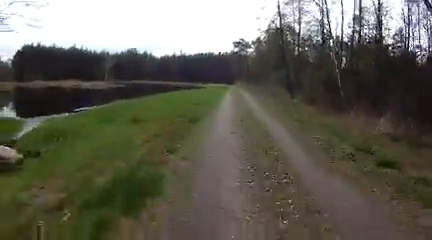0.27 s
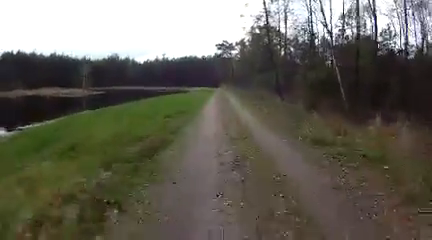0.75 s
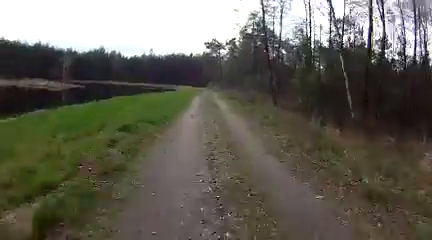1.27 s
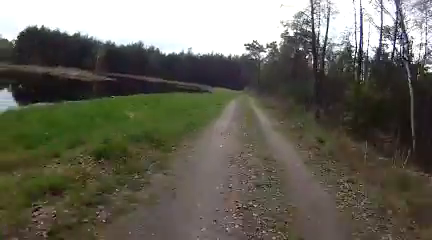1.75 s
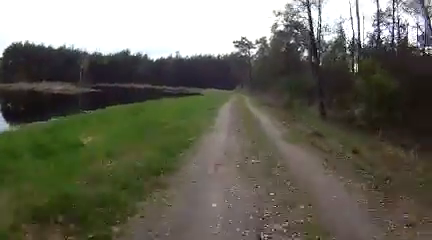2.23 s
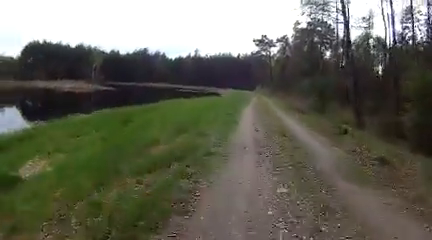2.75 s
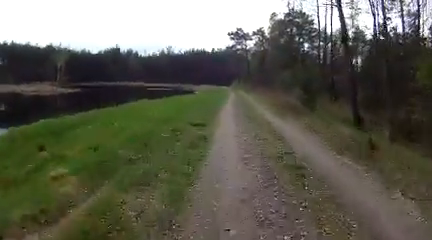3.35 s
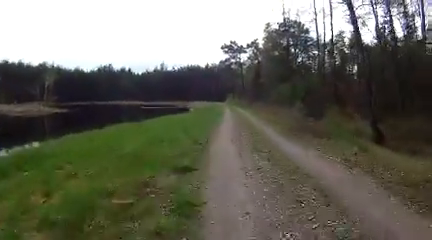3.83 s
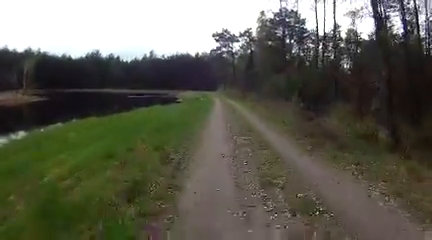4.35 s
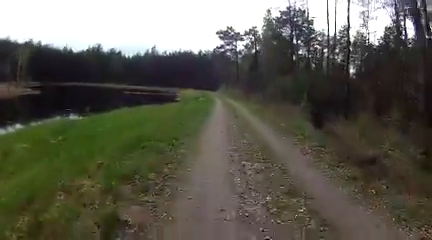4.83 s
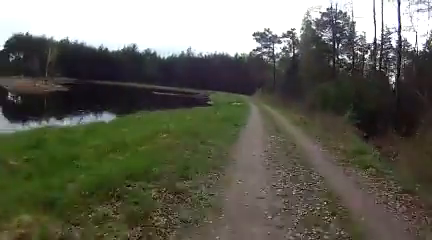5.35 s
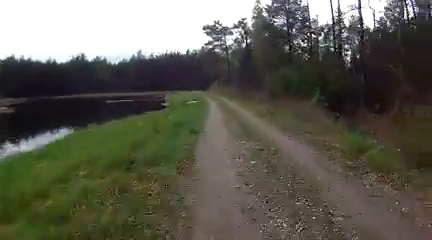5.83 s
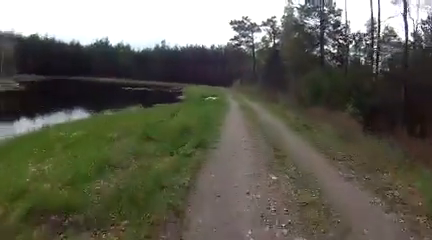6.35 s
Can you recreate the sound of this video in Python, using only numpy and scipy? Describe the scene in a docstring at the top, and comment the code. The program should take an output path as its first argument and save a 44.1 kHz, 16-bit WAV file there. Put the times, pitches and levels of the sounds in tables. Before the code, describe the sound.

Low rumble of bicycle tyres on rough gravel, with a loose part rattling in bursts that thin out as the ride calms.

```python
"""A bicycle rolls along a gravel track, heard through its frame by a small camera on the handlebar.
It opens on rough ground: the mount sways near 50 Hz, the tyres drum the frame's modes and a loose part
rattles on the downswings. From half a second in, stones clack the tubes and jolt the frame. Past 2.5 s
the ride calms and the hits thin out, until a last flurry just after 6 s. Faint hiss lies under it all,
and the camera holds every sample at 12 kHz, which mirrors the sound around 6 and 12 kHz."""
import sys
import numpy as np
from scipy import signal
from scipy.io import wavfile
from scipy.ndimage import uniform_filter1d

SR = 44100
rng = np.random.default_rng(int(sys.argv[2]) if len(sys.argv) > 2 else 0)


def store_pcm(level_fs):
    """Save levels as 16-bit WAV."""
    pcm = np.round(np.clip(level_fs, -1, 1) * 32767).astype(np.int16)
    wavfile.write(sys.argv[1], SR, np.atleast_2d(pcm).T)


N = 290619

# Blows of the loose part. Each row: time in seconds, level in dB, dull against bright part in dB,
# length of the bounces in seconds, first blow against the bounces in dB.
BLOWS = [(0.0074, -25, -3, 0.039, 1), (0.0278, -25, -5.5, 0.032, -4), (0.048, -24, -9, 0.022, -5),
         (0.0674, -34, -9, 0.053, -3), (0.0894, -42, -6, 0.052, -2), (0.1114, -44, -5, 0.04, -1),
         (0.1314, -37, -3, 0.041, -4), (0.1565, -28.5, -4, 0.02, 1), (0.169, -28.5, -4, 0.04, 8),
         (0.1943, -24.5, -19, 0.01, 11.5), (0.2133, -34, -7, 0.018, 13.5), (0.25, -32.5, -7, 0.022, 5),
         (0.2736, -26.5, -3, 0.028, 1.5), (0.2941, -29, -7.5, 0.052, 8), (0.3137, -26.5, -6.5, 0.026, 1.5),
         (0.3588, -30, -7.5, 0.04, 3), (0.4295, -33, -6, 0.015, 1), (0.4505, -36.5, -3.5, 0.036, 1.5),
         (0.5134, -38, -5.5, 0.028, -4), (0.5654, -37.5, -12, 0.05, 3), (0.607, -32, -3.5, 0.035, 1.5),
         (0.63, -24.5, -10.5, 0.055, 4), (0.6692, -30, -1.5, 0.03, 4), (0.7872, -37, -5, 0.041, 4),
         (0.8086, -33, -6.5, 0.046, -2), (0.854, -31.5, -10, 0.032, 1.5), (0.8725, -31, -6, 0.035, -1),
         (0.9154, -24, -11, 0.047, 5), (0.9358, -28, -5.5, 0.036, -5), (0.9812, -26.5, -14, 0.044, 4),
         (1.0721, -47, -13, 0.021, 1.5), (1.1228, -34.5, -18, 0.065, 7.5), (1.1436, -28, -2.5, 0.036, 1.5),
         (1.1943, -29.5, -15, 0.032, 1), (1.2183, -26.5, -5.5, 0.032, 1.5), (1.2421, -28, -1.5, 0.032, 10),
         (1.27, -23.5, -15, 0.035, 1.5), (1.301, -26.5, -5, 0.027, -7), (1.321, -25, -7, 0.019, 5),
         (1.36, -40, -25, 0.023, 6), (1.376, -21.5, -21, 0.01, 5), (1.3982, -27.5, -2.5, 0.062, 6),
         (1.4243, -29.5, -16, 0.058, 8), (1.4437, -29.5, -8, 0.045, -5), (1.4692, -27, -6, 0.036, 6),
         (1.4915, -25.5, -5, 0.018, 8), (1.5135, -33, -9, 0.01, 7), (1.551, -30.5, -10, 0.055, 3),
         (1.5913, -24.5, -8, 0.055, -4), (1.6277, -26.5, -4.5, 0.09, 0), (1.6581, -34.5, -8, 0.052, 1.5),
         (1.6872, -31.5, -4.5, 0.06, -1), (1.728, -30.5, -7, 0.016, 10), (1.7444, -28, -7.5, 0.047, 8),
         (1.7672, -24.5, -7, 0.024, -2), (1.792, -26.5, -17, 0.037, 3), (1.8178, -32, -5.5, 0.055, 9),
         (1.851, -40, -3, 0.037, 0), (1.8832, -30, -6.5, 0.032, 5), (1.9329, -32.5, -0.5, 0.03, -1),
         (1.953, -21, -9, 0.021, -17), (2.0258, -27.5, -8, 0.041, 7), (2.0494, -27, -3, 0.017, 1.5),
         (2.0674, -25, -4, 0.06, 7), (2.0918, -28, -3, 0.022, 9), (2.1061, -26, -5, 0.037, 8),
         (2.1283, -24, -9.5, 0.033, 6), (2.1505, -22, -9, 0.018, 3), (2.1694, -30.5, -6, 0.025, 9),
         (2.1918, -27, -6, 0.027, 5), (2.2092, -27.5, -5, 0.033, 3), (2.232, -27.5, -14, 0.032, 4),
         (2.2532, -31.5, -5.5, 0.042, 6), (2.2875, -30.5, -4.5, 0.037, 5), (2.3077, -27.5, -8, 0.072, -2),
         (2.3325, -31.5, -1.5, 0.081, 1.5), (2.366, -27, -4, 0.022, 5), (2.3853, -28, -4.5, 0.047, 7.5),
         (2.4086, -30, -22, 0.03, 4), (2.4272, -28, -6.5, 0.071, 3), (2.4683, -31.5, -4.5, 0.014, 8),
         (2.4902, -25.5, -4.5, 0.033, -1), (2.5097, -29.5, -13, 0.048, 7), (2.529, -30.5, -0.5, 0.016, 1.5),
         (2.574, -46, 0, 0.03, -3), (2.6329, -52, 1, 0.024, -1), (2.6698, -39, -13, 0.017, 7),
         (2.7167, -29, -4, 0.016, -1), (2.7374, -27.5, -9, 0.051, 7), (2.7806, -40, -15, 0.046, 1.5),
         (2.799, -37.5, -2, 0.06, 1.5), (2.8883, -42, 0.5, 0.044, 1.5), (2.9088, -27, -13, 0.02, -13),
         (2.9916, -34, -9, 0.041, 5), (3.0345, -34.5, -20, 0.044, 9), (3.047, -38, -0.5, 0.048, 3),
         (3.1303, -41, -0.5, 0.017, 1), (3.1587, -32, -6.5, 0.018, 6), (3.312, -34, -17, 0.04, 1.5),
         (3.3324, -37.5, -3.5, 0.02, 1.5), (3.3813, -38.5, -7, 0.021, -3), (3.764, -45, -2, 0.026, -1),
         (3.7798, -36.5, -4, 0.034, 0), (3.9163, -34, -8, 0.041, 3), (3.9454, -46.5, 0, 0.03, 1.5),
         (4.0225, -35, -13, 0.034, 7), (4.0432, -33, -6, 0.024, 9), (4.0632, -31.5, -6.5, 0.046, 7),
         (4.1032, -43, -5, 0.011, 5), (4.2544, -41.5, -10, 0.019, 6), (4.4025, -40, -5, 0.05, 3),
         (4.4162, -34, -5, 0.027, 1.5), (4.4762, -53, -3, 0.028, 1.5), (4.4878, -38.5, -2, 0.045, 0),
         (5.1244, -45.5, -1, 0.026, 3), (5.1348, -44.5, -7, 0.025, -24), (5.4246, -57.5, 8.5, 0.027, -1),
         (5.497, -55, 4, 0.026, 5), (5.532, -37.5, -7.5, 0.025, 1.5), (5.5406, -45, -1, 0.017, 1.5),
         (5.765, -42, -7, 0.01, -8), (5.9281, -43, -16, 0.012, 12.5), (6.1159, -44.5, 2, 0.028, 8.5),
         (6.129, -38, -16, 0.028, 4), (6.1384, -41.5, 2, 0.016, 1.5), (6.1704, -59, 4, 0.02, 3),
         (6.2442, -42, -10, 0.01, 8), (6.2685, -31, -5.5, 0.036, 4), (6.2877, -31.5, -5, 0.017, 1.5),
         (6.3068, -30, -10, 0.024, 9), (6.328, -32, -2, 0.021, 7), (6.34, -26.5, -7, 0.013, 1.5),
         (6.3651, -33, -15, 0.045, 10.5), (6.3844, -40.5, -0.5, 0.032, 1.5), (6.4265, -43, -1.5, 0.043, -1),
         (6.4907, -54, -15, 0.022, 7), (6.5283, -45, -5, 0.034, -1), (6.54, -36, -9.5, 0.018, 5)]
# Stones under the wheel. Each row: time in seconds, push on the frame in dB,
# upper against middle modes in dB, clack of the tubes in dB.
STONES = [(0.449, -19, 17, -56), (0.589, -11.5, 3, -52), (0.826, -23, 5, -35.5), (.896, -13, 1, -35),
          (0.954, -10, 7, -48), (1.078, -28, 2, -39.5), (1.147, -12, -7, -38), (1.245, -5.5, -0.5, -26),
          (1.3, -15, -4, -51), (1.33, -12, -6, -40), (1.37, -13, 10, -48), (1.404, -5.5, 0, -29.5),
          (1.45, -9, 5, -34), (1.492, -11, -12.5, -29), (1.53, -30, 8, -38), (1.548, -16, 8, -38),
          (1.599, -6, 1, -27), (1.711, -12.5, 15.5, -55), (1.797, -42, -8, -38), (1.85, -31, -19, -39),
          (1.908, -27, 4, -31), (1.936, -38, 5, -36), (1.954, -9.5, -7, -56), (2.0, -10, -1, -38),
          (2.02, -11.5, 4, -38), (2.056, -11.5, 3, -32), (2.107, -22, 20, -30.5), (2.227, -15, 10, -50),
          (2.308, -14, 8, -37), (2.37, -8.5, 3, -53), (2.385, -27, -6, -30.5), (2.429, -12.5, 0, -38),
          (2.512, -22, 9, -50), (2.649, -14, -3, -41), (2.699, -14, 2, -56), (2.874, -19, -6, -46),
          (3.144, -20, 5, -45), (3.333, -26, 13, -54), (3.372, -20.5, 13, -49), (3.489, -38, 5, -57),
          (3.628, -22, 12, -46), (3.729, -10.5, -4, -43), (3.872, -13.5, 6, -47), (3.938, -9.5, 2, -42),
          (4.022, -25, 9, -45), (4.088, -18.5, 9, -52), (4.852, -27, -7, -50), (5.324, -27, -17, -56),
          (5.358, -42, -4, -42.5), (6.118, -18, 1, -42), (6.171, -28, 0, -42), (6.242, -13, 12, -50),
          (6.261, -6.5, 2.5, -40), (6.313, -11.5, 14, -46), (6.341, -9.5, -8, -29.5)]
# Low modes of the frame and mount. Each row: pitch in Hz, nominal width in Hz, gain in dB.
FRAME_MODES = [(23.6, 29.6, 3.5), (78.9, 59.3, 5.5), (116, 58.4, -1), (156.8, 64.7, -2), (228.7, 58.5, 2),
               (263, 52.5, 3), (349.8, 29, 8), (396.3, 7.6, -6.5)]
# Higher modes of the tubes. Each row: pitch in Hz, nominal width in Hz, gain in dB.
TUBE_MODES = [(459, 60, 4), (526.7, 40.5, 5), (794.6, 90, 2.5), (840.4, 37.5, -5.5), (1203, 107, -10),
              (1243, 26, -34)]
SWAY_HZ = 49.57


def undb(db):
    """Decibels to gain."""
    return 10 ** (np.asarray(db) / 20)


def unit(x):
    """Scaled to rms 1."""
    return x / np.sqrt(np.mean(x ** 2))


def band(x, hz, width):
    """One resonance, gain 1 at its centre."""
    return signal.lfilter(*signal.iirpeak(hz, hz / width, SR), x)


def ring(x, modes, widen=1):
    """Resonances side by side, each applied twice so that the valleys stay dark."""
    stretch = 1.064 * widen
    return sum(undb(db) * band(band(x, hz, stretch * width), hz, stretch * width)
               for hz, width, db in modes)


def wander(rate_hz):
    """A control that glides from one random level to the next."""
    hold = int(SR / rate_hz)
    return uniform_filter1d(np.repeat(rng.standard_normal(N // hold + 1), hold), hold)[:N]


def grit(per_s, spread_db):
    """Random clicks, a few much stronger than the rest."""
    hit = rng.random(N) < per_s / SR
    return hit * rng.standard_normal(N) * undb(spread_db * np.minimum(rng.exponential(size=N), 3))


def swells(times, levels_db, rise_s, fall_s):
    """Power envelope of events that rise on a bell curve and die away."""
    power, t = np.zeros(N), np.arange(N) / SR
    for at, db, fall in zip(times, levels_db, np.broadcast_to(fall_s, len(times))):
        i, j = np.clip([int((at - .15) * SR), int((at + .6) * SR)], 0, N)
        since = t[i:j] - at
        fade = np.where(since < 0, (since / rise_s) ** 2, np.abs(since / fall) ** 1.04)
        power[i:j] += undb(2 * db) * np.exp(-fade)
    return power


def track_roughness():
    """How hard the track drums the tyres from moment to moment, in dB."""
    # Each row: time in seconds, level in dB.
    roughness = [(0.0, -28), (0.4, -34.5), (0.97, -30.5), (1.04, -36), (1.19, -28), (1.32, -34),
                 (1.61, -27), (1.72, -28.5), (2.31, -31.5), (3.03, -35.5), (4.26, -36.5), (5.03, -37.5),
                 (6.06, -38.5), (6.26, -35), (6.44, -38.5), (6.59, -36.5)]
    times, levels_db = np.transpose(roughness)
    return np.interp(np.arange(N) / SR, times, levels_db)


def sway_depth(rough_db):
    """Bumps swing the mount wide; between them its sway follows the roughness of the track."""
    # The sway under way at the start, then the bumps.
    # Each row: time of the widest swing in seconds, level in dB, decay in seconds.
    opening_sway = [(.03, -21.5, .04)]
    bumps = [(0.1, -35, 0.02), (0.173, -20.5, 0.035), (0.292, -25.5, 0.089), (0.38, -28, 0.029),
             (0.6, -31, 0.03), (0.656, -18, 0.013), (0.773, -26, 0.011), (0.851, -23.5, 0.02),
             (0.933, -23.4, 0.06), (1.12, -31, 0.026), (1.165, -37, 0.017), (1.213, -20.5, 0.031),
             (1.314, -20, 0.018), (1.438, -17, 0.012), (1.493, -25, 0.019), (1.636, -17.5, 0.031),
             (1.736, -19, 0.02), (1.839, -24.5, 0.037), (2.09, -17, 0.041), (2.2, -37, 0.025),
             (2.28, -23, 0.04), (2.375, -17.5, 0.04), (2.47, -27, 0.08), (2.743, -22, 0.034),
             (2.904, -23, 0.041), (3.037, -29, 0.054), (3.302, -26.5, 0.021), (3.38, -27.5, 0.031),
             (3.612, -33.7, 0.028), (3.732, -32, 0.023), (3.81, -33, 0.022), (3.912, -25.5, 0.019),
             (4.042, -27, 0.016), (4.144, -37, 0.034), (4.267, -30.5, 0.021), (4.415, -27, 0.066),
             (4.85, -36, 0.047), (5.095, -29.5, 0.016), (5.312, -37, 0.042), (5.543, -28.5, 0.011),
             (5.625, -29.5, 0.06), (5.88, -33, 0.04), (5.942, -31, 0.027), (6.08, -34, 0.028),
             (6.132, -26, 0.018), (6.266, -29.5, 0.11), (6.45, -34, 0.04), (6.516, -28, 0.03)]
    times, levels_db, decays = np.transpose(opening_sway + bumps)
    calm_power = undb(2 * (rough_db - 5.5))
    return np.sqrt(calm_power + swells(times, levels_db, rise_s=0.028, fall_s=decays))


def sway_phase(past_crest=0.16):
    """Turns of the mount's sway; the loose part strikes just after a crest, whole turns apart."""
    times = [0.]
    for at, *_ in BLOWS:
        if (at - times[-1]) * SWAY_HZ > .7:  # closer blows share a swing
            times.append(at)
    times.append(N / SR)
    turns = np.cumsum(np.maximum(np.round(np.diff(times) * SWAY_HZ), 1))
    return np.interp(np.arange(N) / SR, times, np.r_[0, turns]) + past_crest


def mount_sway(turns):
    """The mount swings as a near sine, pushed off it by the road."""
    push = unit(band(rng.standard_normal(N), SWAY_HZ, width=16))
    return unit(np.sqrt(2) * np.cos(2 * np.pi * turns) + undb(-13.5) * push)


def tyres(rough_db, cushion_hz=380):
    """Gravel grains and tread noise shake the frame; the air in the tyres cushions the treble."""
    road = unit(grit(400, 2.5)) + 1.2 * rng.standard_normal(N)
    road *= undb(1.2 * wander(60))
    drumming = signal.sosfilt(signal.butter(4, cushion_hz, fs=SR, output="sos"), ring(road, FRAME_MODES))
    # the tubes hum on the fine tread and swell with the drumming
    tread = unit(grit(600, 1.0)) + 0.64 * rng.standard_normal(N)
    hum_db = -50.5 + 1.25 * (rough_db - rough_db.mean())
    return undb(rough_db + 4) * unit(drumming) + undb(hum_db) * unit(ring(tread, TUBE_MODES))


def microphone_hiss():
    """The microphone's own noise, a steady bed of two broad bands."""
    # Each row: centre in Hz, width in Hz, relative gain in dB.
    hiss_bands = [(1480, 2000, 4), (4500, 2000, 2.5)]
    hiss = sum(undb(db) * band(rng.standard_normal(N), hz, width) for hz, width, db in hiss_bands)
    return undb(-63) * unit(hiss)


def ticks(turns):
    """Faint touches of the loose part, at most one a swing, each with a short bounce."""
    touches = np.zeros(N)
    downswings = np.flatnonzero(np.diff(np.floor(turns - .2)))
    force, jitter, bounce = rng.standard_normal((N // 400, 3))[:len(downswings)].T
    size = undb(6.6 * force)
    at = np.clip(downswings + (0.0038 * SR * jitter).astype(int), 0, N - 300)
    touches[at] = size
    touches[at + 130] = .5 * size * bounce  # 3 ms later
    return undb(-68) * unit(ring(touches, [(4850, 1300, 0.055), (2200, 710, -2)]))


def chatter(turns, depth, loose_db=-24.5):
    """The loose part's fine clicks around each blow: they peak once a turn and fade in a weak sway."""
    gate = undb(-7 * (1 - np.cos(2 * np.pi * (turns - .3))))
    clicks = unit(grit(2500, 5.5) * gate)
    looseness = np.minimum(depth / undb(loose_db), 1)
    times, levels_db, *_ = np.transpose(BLOWS)
    return clicks * looseness * np.sqrt(swells(times, levels_db - 8, rise_s=.005, fall_s=0.022))


def rattle(turns, depth):
    """The loose part strikes its case: sharp blows with a flurry of bounces, over the chatter."""
    # Modes of the part and the case. Each row: pitch in Hz, nominal width in Hz, gain in dB.
    dull_modes = [(1230, 690, -9), (1807, 730, -3.5), (2102, 694, -2.5), (3104, 885, -4), (3590, 945, -1.5)]
    bright_modes = [(4095, 1040, -12.5), (5037, 516, -2.5), (5403, 700, -1)]
    dull = chatter(turns, depth)
    bright = dull.copy()
    # most bounces ring both sets of modes, some only one
    shared_hits = unit(grit(2500, 2.8))
    dull_hits, bright_hits = (shared_hits + 0.42 * unit(grit(1200, 2.6)) for _ in range(2))
    for at, db, dull_db, length, first_db in BLOWS:
        start = max(int((at - .012) * SR), 0)  # the part starts to buzz just before it lands
        span = np.arange(start, min(start + int(.1 * SR), N))
        since = span / SR - at
        flurry = 0.1 * np.exp(np.where(since < 0, since / 0.0028, -np.abs(2 * since / length) ** 2.33))
        layers = (dull, dull_hits, db + dull_db + 22), (bright, bright_hits, db + 18.5)
        for drive, hits, drive_db in layers:
            drive[span] += undb(drive_db) * flurry * hits[span]
            drive[int(at * SR)] += undb(drive_db + first_db)
    return undb(2.5) * ring(dull, dull_modes) + undb(10) * ring(bright, bright_modes)


def stone_clacks(lead_s=0.00217):
    """Just ahead of its jolt, a stone's click rings the two upper pairs of tube modes."""
    clicks = np.zeros(N)
    for at, _, _, db in STONES:
        clicks[int((at - lead_s) * SR)] = undb(db + 42)
    return ring(clicks, TUBE_MODES[2:4], widen=1.07) + undb(4) * ring(clicks, TUBE_MODES[4:], widen=1.07)


def stone_jolts(thud_db=-3.5):
    """A stone gives the frame one short push; where it lands decides which modes ring."""
    thud, middle, upper = np.zeros((3, N))
    n = int(0.0015 * SR)
    for at, db, tilt_db, _ in STONES:
        i = int(at * SR)
        for push, share_db in (thud, thud_db), (middle, -tilt_db / 2), (upper, tilt_db / 2):
            push[i:i + n] -= undb(db + share_db + 40.5) * np.hanning(n) / n
    groups = (thud, FRAME_MODES[1:4]), (middle, FRAME_MODES[4:6]), (upper, FRAME_MODES[6:])
    ringing = sum(ring(push, modes, widen=1.28) for push, modes in groups)
    return signal.sosfilt(signal.butter(2, 520, fs=SR, output="sos"), ringing)


def scene():
    """All that shakes the camera, over the noise of its microphone, in mono."""
    rough_db = track_roughness()
    depth, turns = sway_depth(rough_db), sway_phase()
    hiss = microphone_hiss()
    rumble = depth * mount_sway(turns) + tyres(rough_db)
    loose_part = rattle(turns, depth) + ticks(turns)
    return (hiss + rumble + loose_part + stone_clacks() + stone_jolts())[None]


def record(dry, guard_hz=5280, top_hz=15400):
    """A guard low-pass, then samples held at 12 kHz: the steps mirror the spectrum; the top is cut."""
    guarded = signal.sosfilt(signal.butter(6, guard_hz, fs=SR, output="sos"), dry)
    coarse = signal.resample_poly(guarded, 40, 147, axis=1)  # down to 12 kHz
    steps = np.repeat(coarse, 4, axis=1)  # each sample held four times: 48 kHz
    held = signal.resample_poly(steps, 147, 160, axis=1)[:, :N]  # back to 44.1 kHz
    return signal.sosfilt(signal.ellip(10, .2, 60, top_hz, fs=SR, output="sos"), held)


dry = scene()
out = record(dry)
store_pcm(out)
```